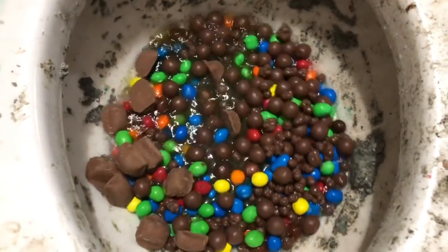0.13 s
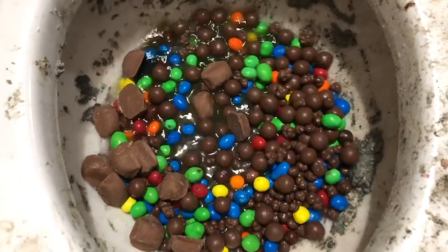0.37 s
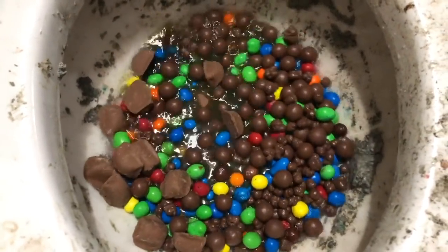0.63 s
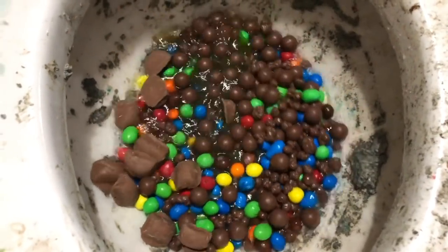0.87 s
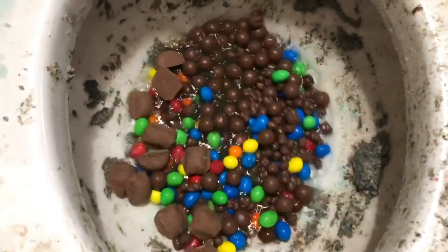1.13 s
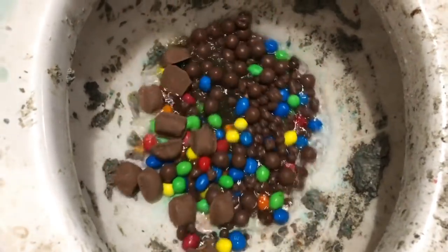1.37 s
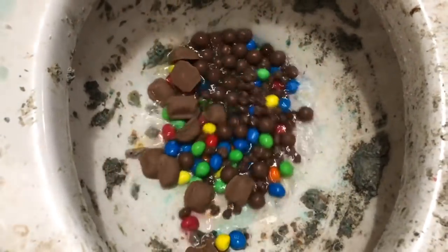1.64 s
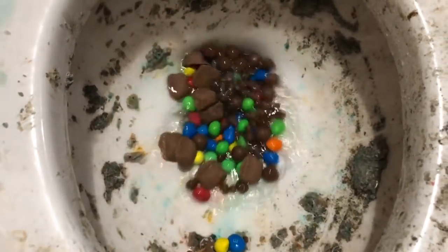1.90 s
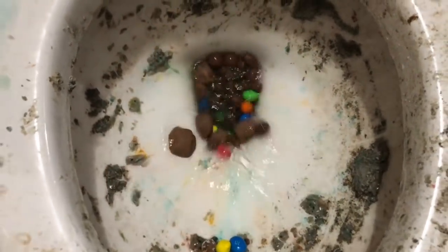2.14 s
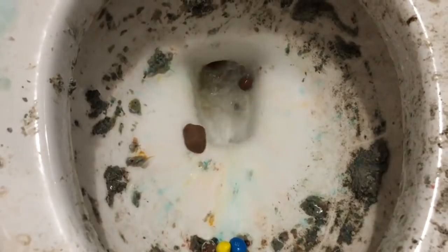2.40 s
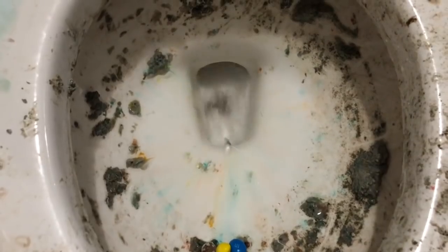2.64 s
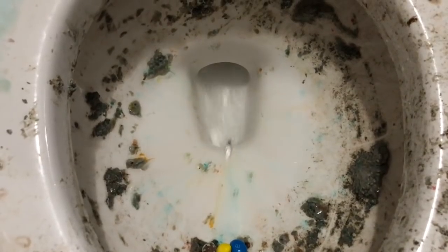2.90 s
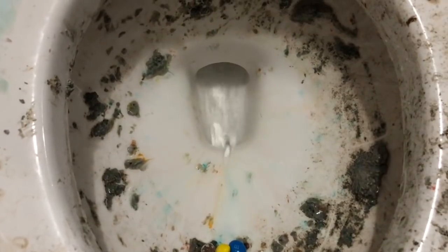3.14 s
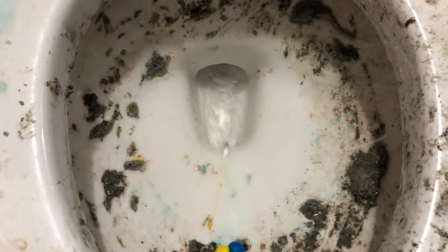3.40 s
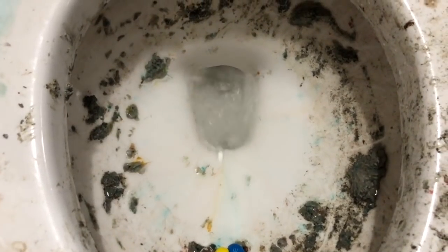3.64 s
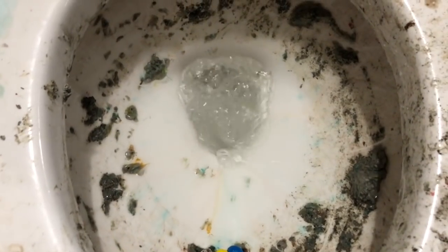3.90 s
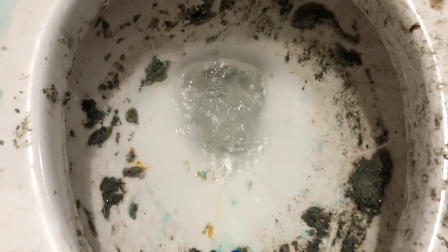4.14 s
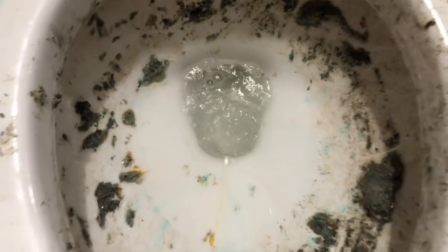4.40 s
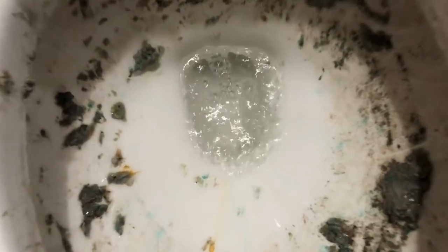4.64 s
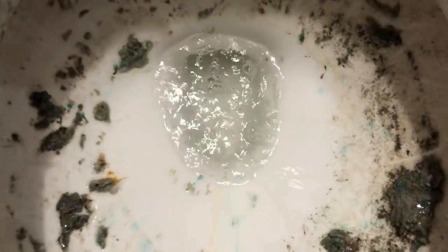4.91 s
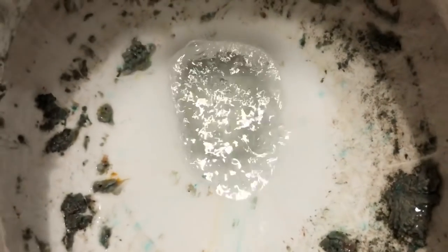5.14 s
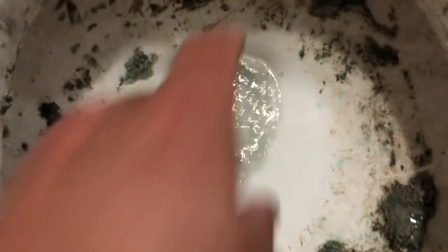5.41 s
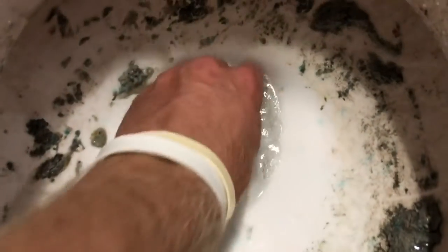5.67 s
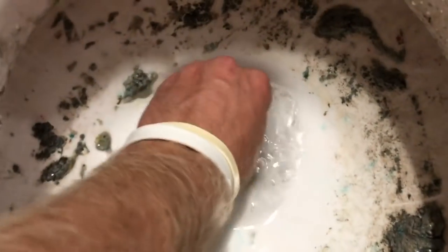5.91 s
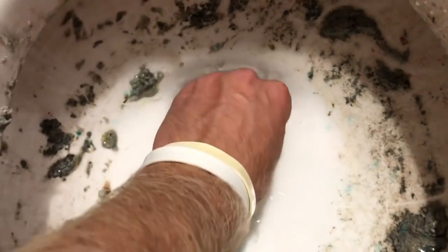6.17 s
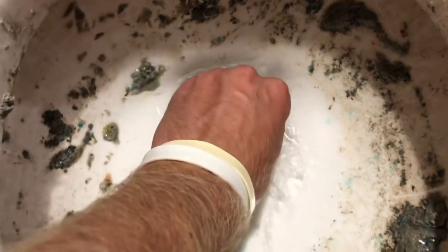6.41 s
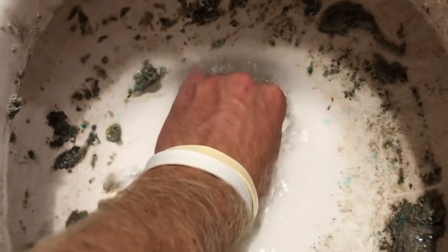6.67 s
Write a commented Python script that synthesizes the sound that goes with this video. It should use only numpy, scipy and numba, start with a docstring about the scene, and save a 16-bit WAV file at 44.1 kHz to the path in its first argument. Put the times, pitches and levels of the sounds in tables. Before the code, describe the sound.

Heard from just above a toilet bowl in a small tiled bathroom: half a second of rushing water and gulps runs backwards, then a hollow hiss swells into a roaring flush. Deep gulps and gurgles grow as the bowl empties, with clicking drops. The rush breaks up and drops to a trickle and fizz over faint mains hum, then a hand splashes with plopping bubbles and bright droplets.

```python
"""Half a second of rushing water and gulps plays backwards, then a toilet flushes, heard from just above the bowl.
Filtered noise and bubble clouds rush and roar in the bowl; decaying tones gulp as the siphon breaks.
The refill trickles and fizzes out over a mains hum of two wavering sines and faint noise.
A hand then splashes in the trap: gliding bubble tones, droplets and noise spray. A short splice dips the sound."""
import sys
import numpy as np
from scipy import signal
from scipy.fft import rfft, irfft
from scipy.io import wavfile
from scipy.ndimage import uniform_filter1d
from numba import njit

SR = 44100
rng = np.random.default_rng(int(sys.argv[2]) if len(sys.argv) > 2 else 0)


def level_to_linear(level):
    """Convert decibel levels to linear amplitude factors, elementwise."""
    exponent = np.asarray(level, float) / 20
    return 10 ** exponent


def materialize(psi):
    """Save the field psi as 16-bit PCM at rate SR to the path in sys.argv[1].

    A 1-D psi becomes a single channel; in a 2-D psi each row is a channel.
    """
    bounded = np.clip(np.atleast_2d(psi).T, -1, 1)
    quanta = np.round(bounded * 32767).astype(np.int16)
    wavfile.write(sys.argv[1], SR, quanta)


N = 299439


def level(x, db):
    """Set the rms level."""
    return x * level_to_linear(db) / np.sqrt(np.mean(x ** 2))


def colour(x, points):
    """Filter by (Hz, dB) points joined on a log axis."""
    hz, db = np.transpose(points)
    axis = np.log(np.arange(N // 2 + 1) * SR / N + 1)
    return irfft(rfft(x) * level_to_linear(np.interp(axis, np.log(hz), db)), N)


def ring(x, hz, width_hz):
    """One resonance, gain 1 at the centre."""
    return signal.lfilter(*signal.iirpeak(hz, hz / width_hz, fs=SR), x)


def walk(rate_hz):
    """Random levels held 1 / rate_hz and slewed twice; spread near 1."""
    k = int(SR / rate_hz)
    steps = np.repeat(rng.standard_normal(N // k + 1), k)
    return 1.48 * uniform_filter1d(uniform_filter1d(steps, k), k)[:N]


def curves(rows):
    """Columns joined by straight lines in time."""
    s, *columns = np.transpose(rows)
    return [np.interp(np.arange(N) / SR, s, c) for c in columns]


@njit
def bubbles(count, s, peak, hz, cycles, glide, swell, hold):
    """Each bubble swells in a few cycles, dies 20 dB in its cycles (late if hold nears 1), pitch moves by glide."""
    out = np.zeros(count)
    for k in range(len(s)):
        span = cycles[k] * SR / hz[k]
        start = int(s[k] * SR)
        phase = 0.
        for i in range(min(int(2.5 * span), count - start)):
            age = i / span
            phase += min(hz[k] * (1 + glide[k] * age) / SR, .45)
            fade = np.exp(-2.3 * age * (1 - hold + hold * age))
            out[start + i] += peak[k] * min(phase / swell, 1.) * fade * np.sin(2 * np.pi * phase)
    return out


def played(rows, glide, swell):
    """Bubbles from rows of start in seconds, level in dB, pitch in Hz, decay in cycles."""
    s, db, hz, cycles = np.transpose(rows)
    return bubbles(N, s, level_to_linear(db), hz, cycles, glide + 0 * s, swell, 0.)


def swarm(rate, mid_hz, octaves, scatter_db, cycles, glide):
    """Bubbles at random moments; pitch scatters round mid_hz, a few are much louder than the rest."""
    chance = rng.random((N // 8, 5))
    at = np.arange(N // 8) * 8
    born = chance[:, 0] < rate[at] * 8 / SR
    hz = np.clip(mid_hz[at] * 2 ** (octaves * (chance[:, 1] + chance[:, 2] - 1)), 60, 15500)
    size = level_to_linear(-scatter_db * np.log(chance[:, 3] + 0.00071))
    span = cycles * (.5 + chance[born, 4])
    return bubbles(N, at[born] / SR, size[born], hz[born], span, glide * chance[born, 4], 1.56, 0.)


def bursts(s, db, decay_s, hz, width_hz):
    """Puffs of noise that build in a third of their decay time, in one broad band."""
    hits = np.zeros(N)
    hits[(s * SR).astype(int)] = level_to_linear(db)
    hits = signal.lfilter([1], [1, -np.exp(-1 / (decay_s * SR))], hits)
    hits = signal.lfilter([3 / (decay_s * SR)], [1, -np.exp(-3 / (decay_s * SR))], hits)
    return ring(ring(hits * rng.standard_normal(N), hz, width_hz), hz, width_hz)


def specks(s, db, hz, cycles):
    """Each drop breaks into eight tiny bubbles near its own pitch, weaker the later they come."""
    spread_s, octaves = 0.0049, 0.34
    chance = rng.random((len(s), 8, 3))
    late = -np.log(chance[..., 0] + .02)
    pitch = hz[:, None] * 2 ** (octaves * (chance[..., 1] + chance[..., 2] - 1))
    rows = [s[:, None] + spread_s * late, db[:, None] - 2.8 * late, np.minimum(pitch, 15500), cycles + 0 * late]
    return played(np.transpose([r.ravel() for r in rows]), glide=.15, swell=1.1)


# Rushing water. Each row: time in seconds, flow in dB, brightness in dB per octave.
FLOW = [(.5, -34, -3.5), (.58, -34.5, 5), (.67, -35.5, 4.5), (.78, -33, 3.5), (.85, -25.5, 0.5),
        (.9, -23, 0.07), (1.4, -21.5, 0.5), (1.95, -23, 0.2), (2.02, -25, 0.5), (2.07, -22.5, 0),
        (2.19, -25.5, 0.8), (2.3, -23.5, -0.2), (2.63, -23, -0.3), (2.7, -26, 0.6), (2.85, -23, -0.8),
        (3.02, -25.5, -0.5), (3.12, -23.5, -0.5), (3.26, -28, -2), (3.38, -28, -0.5), (3.6, -33.5, -0.5),
        (3.64, -31, 1.5), (3.7, -34.5, 0), (3.8, -42.5, -0.5), (3.91, -38.5, 1), (4.0, -42.5, 1.5),
        (4.09, -41.5, 1.5), (4.2, -43, 0.1), (4.45, -54.5, 0.5), (4.75, -57.5, -1), (5.05, -55, -2),
        (5.5, -61, -3), (5.85, -70, 0.5)]
# Water spectrum before the voices are levelled. Each row: frequency in Hz, gain in dB.
WATER_COLOUR = [(35, -41), (70, -16), (121, -12.5), (189, 0), (300, -1.5), (375, -10), (467, -2.5),
                (646, 0.5), (810, -6), (1520, -6.5), (2770, -8.5), (6400, -18), (7600, -27.5), (16000, -34)]
# Air in bowl and trap. Each row: pitch in Hz, width in Hz, gain over the water in dB, gain added once empty in dB.
BOWL_NOTES = [(191, 47, 8, -11.5), (269, 60, -2, 1.5), (489, 78, -0.5, -2.5), (659, 50, 2, -3.5),
              (707, 16, -0.5, -1), (1321, 31, -8, 4), (1520, 33, -5.5, 6.5), (2140, 36, -2, -6),
              (3290, 38, -5.5, 5.5)]
# Crossovers between the water's voices, in Hz.
CROSS_HZ = (140, 900, 2600, 7000)
# Pipe rumble, bowl roar, gurgle, rush, spray.
# Each row: centre in Hz, level at full flow in dB, dB gained per dB of flow.
VOICES = [(90, -55, .5), (454, -26.5, 1.0), (1514, -27.5, 1.07), (4300, -29.5, 1.24), (10500, -43, 1)]


def rush():
    """Churning noise and a cloud of bubbles ring the bowl; rumble, roar, gurgle, rush and spray follow the flow."""
    full_flow_db, pivot_hz, tilt_top_octaves = -22.5, 1517, 2.5
    boom_s, boom_rise_s, boom_hold_s, boom_fall_s, boom_db = 3.34, 0.34, 0.45, .15, 16.5
    flat, t = np.ones(N), np.arange(N) / SR
    flow_db, tilt_db = curves(FLOW)
    over_db = flow_db - full_flow_db
    empty = t >= 2.2  # the bowl has emptied

    # a thin flow breaks into surges
    surge_db = np.clip(0.1 - 2.5 * over_db, 0, 1) * walk(28.16)
    churn = 0
    for hz in 45 * 2 ** np.arange(0, 8.5, .5):
        churn = churn + level_to_linear(surge_db + 2.0 * walk(30.0)) * ring(rng.standard_normal(N), hz, hz / 2)
    cloud = swarm(4500 * flat, 1200 * flat, octaves=3.5, scatter_db=3.0, cycles=7.84, glide=0.33)
    water = colour(level(churn, -4) + level(np.diff(cloud, prepend=0), -9.0), WATER_COLOUR)

    # each note swells and sinks as the water heaves
    notes = 0
    for hz, width_hz, db, empty_db in BOWL_NOTES:
        notes = notes + level_to_linear(db + empty_db * empty + 2 * walk(13)) * ring(water, hz, width_hz)
    water = water + notes

    lows = [signal.sosfiltfilt(signal.butter(4, hz, fs=SR, output="sos"), water) for hz in CROSS_HZ]
    parts = np.diff([0 * water, *lows, water], axis=0)
    voices = []
    for part, (hz, db, follow) in zip(parts, VOICES):
        bright_db = tilt_db * min(np.log2(hz / pivot_hz), tilt_top_octaves)
        voices.append(level_to_linear(db + follow * over_db + bright_db) * level(part, 0))

    # the drain pipe booms while the siphon breaks
    boom = np.interp(t, boom_s + np.cumsum([0, boom_rise_s, boom_hold_s, boom_fall_s]), [0, 1, 1, 0])
    stop = np.clip((5.85 - t) / 0.23, 0, 1)  # the refill valve shuts
    return stop * (level_to_linear(boom_db * boom) * voices[0] + sum(voices[1:]))


# Mains hum. Each row: frequency in Hz, level before waver and drift in dB.
HUM = [(59.5, -56), (119.5, -58.5)]
# Hum drift. Each row: time in seconds, gain in dB.
HUM_DRIFT = [(.5, 1), (4.2, -13), (4.8, 1.5), (5.6, 0.5), (6.8, -6.5)]
# Bathroom noise spectrum before levelling. Each row: frequency in Hz, gain in dB.
ROOM_COLOUR = [(30, -20.5), (60, -3.5), (185, -8.5), (256, -4.5), (310, -6), (365, -23), (600, -22),
               (800, -28), (1200, -23), (3200, -41), (6000, -41), (16000, -45.5)]


def room():
    """Mains hum, two sines wavering and drifting in level, over the steady coloured noise of the bathroom."""
    t = np.arange(N) / SR
    hum = sum(level_to_linear(db + 1.5 * walk(3)) * np.sin(2 * np.pi * hz * t) for hz, db in HUM)
    quiet = level(colour(rng.standard_normal(N), ROOM_COLOUR), -61)
    return level_to_linear(curves(HUM_DRIFT)[0]) * hum + quiet


# Ticking drops and small bubbles. Each row: start in seconds, base level in dB, pitch in Hz.
TICKS = [(0.5894, -20, 2210), (0.591, -16, 3730), (0.6, -18, 3860), (0.646, -17, 4460), (1.495, -19, 6100),
         (1.502, -17.5, 5370), (1.5, -14, 11500), (2.37, -21, 13000), (2.4368, -17, 7360),
         (2.665, -25, 6440), (2.7568, -12.5, 6300), (2.9306, -18, 5650), (3.118, -19, 6300),
         (3.388, -30, 6700), (3.48, -27, 8500), (3.5247, -16, 6860), (3.528, -19, 6000), (3.547, -23, 4450),
         (3.615, -23, 2920), (3.636, -19, 5000), (3.706, -29, 6500), (3.6277, -22, 6900),
         (3.6366, -22, 2270), (3.663, -20.5, 6020), (3.712, -23.5, 6550), (3.7594, -24, 11700),
         (3.8062, -25, 12200), (3.7605, -28, 4730), (3.832, -34, 1800), (3.835, -32, 4500),
         (3.877, -30, 3200), (3.897, -39, 1900), (3.9, -37, 5000), (4.02, -37, 2020), (4.087, -32, 2880),
         (4.22, -39, 4000), (4.545, -45, 4400), (5.105, -53, 4500), (5.28, -49, 4200), (5.372, -51, 4600),
         (3.8952, -29, 3700), (4.0741, -35, 3600), (4.132, -35, 1520), (4.1545, -30, 2110),
         (4.2223, -32, 2080), (4.3983, -26, 9550), (4.465, -39, 2820), (4.62, -53, 3840), (4.63, -48, 9500),
         (4.647, -43, 5400), (4.6755, -42, 5500), (4.679, -47, 11000), (4.7097, -45, 9270),
         (4.712, -52, 5600), (4.721, -49, 5200), (4.733, -48, 5600), (4.817, -45, 5330), (4.82, -46, 9500),
         (4.857, -49, 5600), (4.88, -57, 11500), (4.916, -48, 3600), (5.003, -45, 6000), (5.085, -53, 6500),
         (4.7497, -30.5, 11800), (4.8906, -41, 5670), (4.903, -35, 7100), (4.931, -36, 6450),
         (4.9536, -43, 5860), (4.9861, -45, 6140), (5.1302, -46, 10100), (5.306, -40.5, 8760),
         (5.3396, -44, 9450), (5.3866, -46, 7900), (5.447, -47, 8530), (5.592, -47, 1630),
         (5.6104, -53, 1630), (5.31, -48, 4030), (5.4226, -52, 3900), (5.7364, -55, 2940),
         (5.7036, -48.5, 7240)]
# Fine bubbles and spray. Each row: time in seconds, middle pitch in Hz, bubble gain in dB, spit gain in dB.
FIZZ = [(.5, 3830, -26.5, -30.5), (.85, 5160, -33, -59), (2.8, 9300, -37, -33), (3.8, 9000, -72, -48.5),
        (4.3, 4400, -57, -60), (4.6, 4900, -53, -62), (5.0, 6500, -66, -63.5), (5.4, 5640, -70.5, -61),
        (6.2, 5420, -63.5, -71.5), (6.35, 4640, -39, -50.5), (6.8, 4540, -62, -47)]
# Coarse and fine spray. Each row: centre in Hz, width in Hz, base level in dB.
SPIT_BANDS = [(8500, 9300, -1), (12300, 10000, -2)]


def ticks():
    """Drops click and ring; tiny bubbles burst and spray spits between them."""
    s, db, hz = np.transpose(TICKS)
    cycles = 11 * (hz / 2000) ** -.15
    drops = played(np.transpose([s, db + 1.5, hz, cycles]), glide=0.03, swell=3.2)
    clicks = played(np.transpose([s, db + 0.5, hz, 0 * s + 1]), glide=.3, swell=0.34)
    clicks = clicks + bursts(s, db - 16.5, 0.0038, 10000, 20000) + specks(s, db - 8, hz, cycles=7.3)

    fizz_hz, fizz_db, spit_db = curves(FIZZ)
    bubbles_per_s, spits_per_s = 330, 85  # spits: in each band
    fizz = swarm(bubbles_per_s + 0 * fizz_hz, fizz_hz, octaves=1.233, scatter_db=2.0, cycles=12.4, glide=0.23)
    spits = 0
    for hz, width_hz, band_db in SPIT_BANDS:
        when, size = rng.random((2, int(spits_per_s * N / SR)))
        spits = spits + bursts(when * N / SR, band_db - 3.2 * np.log(size + 0.0067), 0.0028, hz, width_hz)

    flutter = level_to_linear(0.55 * walk(600))  # jostled in moving water
    return flutter * drops + clicks + level_to_linear(fizz_db) * fizz + level_to_linear(spit_db) * spits


# Big air pockets swallowed by the flow.
# Each row: start in seconds, base level in dB, pitch in Hz, decay in cycles.
GULPS = [(0.823, -20, 714, 7.8), (0.877, -9.5, 649, 12), (0.889, -17, 637, 11), (.945, -22.5, 620, 6.5),
         (.966, -15, 560, 6.2), (.985, -15, 680, 9.7), (1.095, -15, 660, 10), (1.125, -18, 610, 10),
         (1.235, -20, 690, 13), (1.318, -17.5, 635, 32), (1.685, -19, 690, 16), (1.93, -20, 640, 7.9),
         (2.065, -14.5, 693, 11), (2.13, -18.5, 193, 6.1), (2.249, -9.5, 654, 4.2), (2.27, -14, 217, 2.6),
         (2.284, -20, 2130, 13), (2.304, -9.5, 674, 6), (2.609, -6.5, 624, 2.5), (2.7238, -8.5, 1320, 14),
         (2.728, -19, 690, 7), (2.742, -13, 1320, 5.6), (2.758, -17, 1430, 7), (2.77, -16, 1020, 9.4),
         (2.744, -9.5, 267, 3.1), (2.758, -7.5, 1070, 7.3), (2.774, -22.5, 259, 2.9),
         (2.804, -16, 694, 6.9), (2.873, -7.5, 277, 2.1), (2.873, -14.5, 1380, 9.8), (2.895, -14, 398, 3.8),
         (2.968, -23, 257, 3.4), (3.1045, -9, 680, 4.7), (3.1109, -5, 414, 2), (3.113, -9.5, 1000, 6.1),
         (3.114, -19, 1600, 7.3), (3.18, -13, 557, 2.9), (3.196, -10.5, 755, 2.5), (3.21, -18.5, 302, 4),
         (3.233, -11.5, 1140, 5.5), (3.2819, -7.5, 870, 4), (3.2835, -8.5, 316, 4), (3.287, -18, 1270, 8),
         (3.3, -9, 750, 8.6), (3.302, -15, 350, 4.6), (3.322, -17, 690, 8.9), (3.334, -17, 680, 9),
         (3.399, -14, 1560, 6), (3.4, -21, 720, 4.3), (3.492, -16.5, 530, 4), (3.511, -24, 323, 2.6),
         (3.531, -21, 795, 5.6), (3.637, -12, 1800, 5.7), (3.671, -18.5, 1180, 11),
         (3.664, -17.5, 1040, 10.4), (3.679, -27, 380, 3.9), (3.715, -26, 700, 5), (3.745, -31, 1115, 15),
         (3.833, -30, 650, 8.3), (3.893, -27.5, 623, 16), (3.92, -33, 636, 9.1), (3.955, -32, 614, 6.3),
         (4.028, -38, 626, 5), (4.076, -40, 637, 7), (4.12, -34, 630, 8.8), (4.225, -41, 675, 9),
         (4.108, -32, 794, 7.9), (4.136, -33, 1050, 4.8), (4.19, -37, 690, 8.9)]
# Dull thuds in the drain pipe. Each row: start in seconds, level in dB, pitch in Hz.
THUDS = [(0.604, -28.5, 133), (.71, -24, 137), (0.736, -26, 127), (0.774, -26, 130), (2.85, -35, 110),
         (3.115, -36.5, 98), (3.28, -30.5, 90), (3.501, -37, 111), (3.591, -32, 109), (3.619, -29, 106),
         (3.731, -35, 99), (3.889, -28, 85), (3.98, -32, 108)]


def gulps():
    """A swallowed pocket rings, the water slaps shut over it and throws spray; slugs of water thud in the pipe."""
    s, db = np.transpose(GULPS)[:2]
    pockets = level_to_linear(-0.35) * played(GULPS, glide=0.14, swell=0.76)
    slap = bursts(s, db + 2.5, 0.002, 800, 1000)
    spray = bursts(s, db - 26.0, 0.0064, 11000, 8100)
    thud_cycles = 3.5
    thuds = played([(*row, thud_cycles) for row in THUDS], glide=0.066, swell=0.69)
    return pockets + slap + spray + thuds


# Hollow note of the rim channels before the siphon starts.
# Each row: pitch in Hz, width in Hz, level before flutter in dB.
RIM_NOTES = [(314, 124, -42), (790, 96, -43.5), (1204, 23, -45.5), (1800, 42, -47), (2270, 300, -41.5),
             (2666, 29, -52), (3700, 53, -59), (4000, 110, -47), (4400, 200, -49.5)]


def rim():
    """Air-filled channels whistle hollowly, as fluttering noise resonances, until the water floods them."""
    end_s, fade_s = 0.846, 0.033
    notes = 0
    for hz, width_hz, db in RIM_NOTES:
        notes = notes + level_to_linear(3.6 * walk(23.3)) * level(ring(rng.standard_normal(N), hz, width_hz), db)
    return notes * np.clip((end_s - np.arange(N) / SR) / fade_s, 0, 1)


# One slug of water. Single row: level in dB, pitch in Hz, decay in cycles.
THUMP = (-8.5, 153, 1.35)


def thump():
    """A slug of water hits the trap: one low, falling tone that dies within a few cycles."""
    start_s = 1.5015
    return played([(start_s, *THUMP)], glide=-0.19, swell=0.3)


# Bubbles the hand traps.
# Each row: start in seconds, level in dB, pitch in Hz, decay in cycles, pitch rise as a share.
SPLASHES = [(5.833, -44.5, 2160, 13, -0.047), (5.841, -37, 1150, 6.6, 0.14), (5.872, -54.5, 700, 9, -0.08),
            (5.935, -53, 1650, 22, .3), (5.95, -34, 1150, 8.7, 0.1), (5.96, -48, 1150, 10, .1),
            (5.98, -56, 1140, 11, 0.17), (6.029, -33.5, 1107, 12, 0.12), (6.037, -47, 1140, 12, -0.009),
            (6.04, -54, 1600, 12, .2), (6.103, -45, 1165, 22, 0.51), (6.12, -59, 1660, 16, .05),
            (6.157, -25, 2040, 17, -0.098), (6.307, -23.5, 893, 20, 0.85), (6.319, -26, 1360, 24, -0.04),
            (6.329, -35, 851, 20.4, .5), (6.35, -25, 1420, 5.9, -0.035), (6.3646, -17.5, 900, 5.1, 0.16),
            (6.3655, -18, 2050, 6.7, -0.048), (6.367, -31, 714, 22, 0.098), (6.37, -20, 1060, 23, 0.68),
            (6.371, -23.5, 1704, 50, 0.0048), (6.401, -31, 1100, 12, 0.098), (6.41, -28, 1210, 14, 0.28),
            (6.428, -23.5, 1010, 11, 0.15), (6.429, -22, 350, 2.9, 0.73), (6.437, -43, 513, 17, .1),
            (6.445, -49, 805, 12, 0.0012), (6.451, -54, 1600, 14, -0.066), (6.47, -46, 1350, 33, -0.054),
            (6.509, -36, 1110, 8.6, 0.041), (6.5134, -17.5, 1220, 9, 0.22), (6.512, -38, 700, 15, .15),
            (6.511, -43, 2060, 12, .05), (6.54, -20.5, 1390, 4.9, -0.031), (6.556, -29, 1150, 11, -0.038),
            (6.556, -33, 1950, 12, .1), (6.572, -30.5, 693, 29, 1.9), (6.592, -29, 1780, 14, -0.12),
            (6.602, -19.5, 1310, 5.7, -0.097), (6.607, -24, 385, 3, 0.8), (6.62, -41, 1130, 20, .1),
            (6.645, -52, 1200, 20, -0.0085), (6.674, -32.5, 1130, 4.8, 0.15), (6.683, -44, 1040, 25, 0.45),
            (6.702, -40, 1050, 14, 0.022), (6.711, -30, 1360, 17, -0.048), (6.721, -25.5, 1330, 12, 0.61),
            (6.725, -24, 1990, 14, 0.43), (6.746, -31, 1170, 13, 0.21), (6.757, -17.5, 384, 2.5, 0.81),
            (6.7587, -16, 908, 11.4, 0.31), (6.7619, -11.5, 1230, 11, 0.5), (6.772, -17, 1060, 6.8, 0.2),
            (6.775, -21, 1660, 14, 0.12), (6.782, -35, 1100, 10, .1)]
# Droplets the hand throws. Each row: start in seconds, level in dB, pitch in Hz, fine spray base level in dB.
DROPLETS = [(5.832, -44.5, 2900, -59), (5.834, -42.5, 5500, -64), (5.9324, -49, 4730, -72),
            (5.95, -35.5, 5370, -51), (5.9604, -33.5, 2600, -44), (6.0282, -48, 5060, -64),
            (6.067, -36, 3600, -63), (6.08, -31.5, 4440, -54), (6.1054, -46, 5350, -44),
            (6.126, -36, 3290, -62), (6.1413, -29, 3240, -29), (6.1557, -15, 5240, -55),
            (6.2, -44, 4140, -56), (6.227, -43, 4150, -62), (6.149, -47, 2250, -60),
            (6.081, -48, 5040, -60), (6.058, -53, 6700, -62), (6.257, -37, 5060, -42),
            (6.261, -37, 5120, -32.5), (6.2657, -43, 5030, -35), (6.2807, -30, 4200, -54),
            (6.281, -36, 2500, -60), (6.302, -40, 3200, -55), (6.297, -46, 3200, -54),
            (6.3085, -27, 6350, -35), (6.329, -34, 3520, -44), (6.341, -33, 4340, -28.5),
            (6.366, -28.5, 3200, -27), (6.371, -21, 3340, -27), (6.4069, -19, 3970, -51),
            (6.426, -28, 5100, -35), (6.4644, -53, 2460, -38), (6.529, -44, 6760, -53),
            (6.54, -18, 4300, -29), (6.572, -32, 3470, -49), (6.58, -26, 2770, -43),
            (6.6034, -21.5, 3020, -29.5), (6.629, -31, 4200, -40), (6.6554, -38, 6860, -54),
            (6.674, -39, 2280, -62), (6.71, -29, 3800, -32), (6.714, -26, 4500, -45),
            (6.719, -23, 2900, -45), (6.723, -18.5, 3850, -30), (6.747, -32, 3680, -28),
            (6.724, -26, 5900, -34), (6.765, -27, 6860, -30), (6.78, -25, 5500, -30.5),
            (6.5422, -20.5, 5650, -39), (6.604, -25, 5240, -36), (6.407, -27, 5600, -47),
            (6.428, -31, 7450, -44), (6.536, -35, 4800, -55), (6.696, -55, 9000, -46),
            (6.757, -36, 3580, -25), (6.772, -22, 2650, -29), (6.773, -30, 3880, -41),
            (6.762, -29, 5300, -40)]
# Air between hand and porcelain. Each row: pitch in Hz, width in Hz, gain before flutter in dB.
TRAP_NOTES = [(690, 28, -12), (1170, 23, -12.5), (1994, 11, -2.5), (4150, 37, -14)]


def hand():
    """Trapped bubbles, droplets and spray; a gurgle of small bubbles fills the gaps, the air round the hand rings."""
    s, db, hz, cycles, rise = np.transpose(SPLASHES)
    big = bubbles(N, s, level_to_linear(db), hz, cycles, rise, 1.4, 0.55)

    # each trapped bubble sets the water round the fingers gurgling
    stir_db, stir_decay_s = -26, 0.024
    stir = np.zeros(N)
    stir[(s * SR).astype(int)] = level_to_linear(db + stir_db)
    stir = signal.lfilter([1], [1, -np.exp(-1 / (stir_decay_s * SR))], stir)
    flat = np.ones(N)
    gurgle = level(swarm(900 * flat, 1500 * flat, octaves=1.35, scatter_db=2.0, cycles=8.6, glide=.5), 0)

    s, db, hz, spray_db = np.transpose(DROPLETS)
    small = played(np.transpose([s, db, hz, 0 * s + 14.7]), glide=0.039, swell=5.9)
    clicks = played(np.transpose([s, db - 4.5, hz, 0 * s + 2.8]), glide=0.24, swell=0.84)
    spray = bursts(s, db - 10, 0.0058, 3950, 3600) + bursts(s, spray_db + 4.0, 0.0023, 11300, 6300)
    spray = spray + specks(s, db - 8.5, hz, cycles=6.9) + clicks

    flutter = level_to_linear(0.55 * walk(500))  # jostled in moving water
    water = flutter * (big + small) + spray + stir * gurgle
    return water + sum(level_to_linear(db + 3.0 * walk(90)) * ring(water, hz, width_hz) for hz, width_hz, db in TRAP_NOTES)


def porcelain(x, t60_s, wet_db):
    """Dense short echoes of the bowl and tiled walls, duller than the direct sound."""
    t = np.arange(SR // 3) / SR
    tail = rng.standard_normal(len(t)) * np.exp(-np.log(1000) * t / t60_s) * (t > .002)
    tail = signal.lfilter([1], [1, -.5], tail)
    return x + level_to_linear(wet_db) * signal.fftconvolve(x, tail / np.sqrt(np.sum(tail ** 2)))[:N]


def scene():
    """Gulps, ticks and thump share one set of echoes, the hand has its own; rush, rim and room stay dry."""
    near = porcelain(ticks() + gulps() + thump(), t60_s=0.043, wet_db=-10.5)
    splashing = porcelain(hand(), t60_s=0.087, wet_db=-13)  # close bubbles echo less
    return (rush() + room() + near + rim() + splashing)[None]


def low_pass(x):
    """Removes everything above the highest recorded frequency."""
    return signal.sosfilt(signal.butter(12, 16510, fs=SR, output="sos"), x)


def record(dry):
    """A small microphone without deep bass or top; the next half second opens reversed and each join dips."""
    bottom_hz, top_hz = 50, 15900
    turn_s, splice_s, fade_s = .51442, 2.350, .014
    heard = signal.sosfilt(signal.butter(4, bottom_hz, "high", fs=SR, output="sos"), dry)
    heard = signal.sosfilt(signal.ellip(8, .2, 70, top_hz, fs=SR, output="sos"), heard)
    turn = int(turn_s * SR)
    backwards = heard[:, turn:2 * turn][:, ::-1]
    mix = np.concatenate([backwards, heard[:, turn:]], axis=1)
    t = np.arange(N) / SR
    mix = mix * np.clip(abs(t - splice_s) / fade_s, .03, 1)
    mix = mix * np.clip(abs(t - turn_s) / fade_s, .5, 1)
    return low_pass(mix)


dry = scene()
out = record(dry)
materialize(out)
```